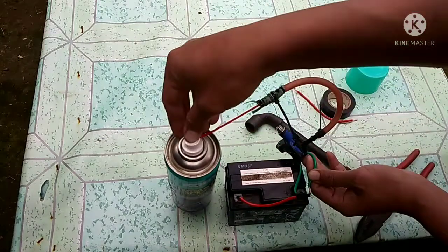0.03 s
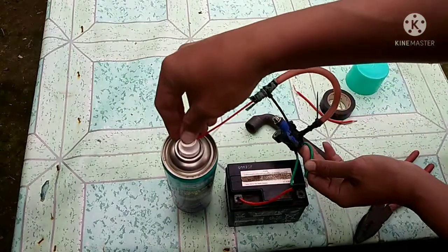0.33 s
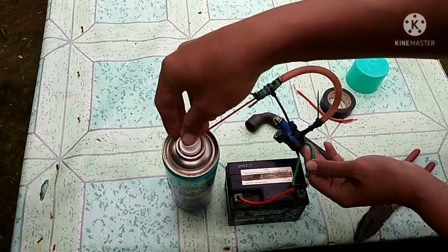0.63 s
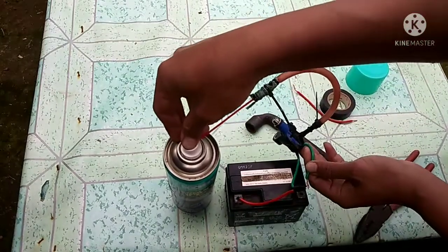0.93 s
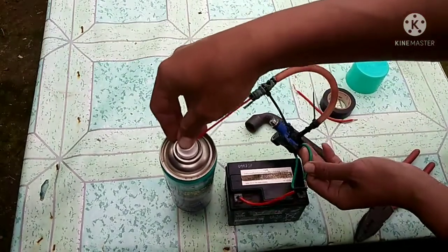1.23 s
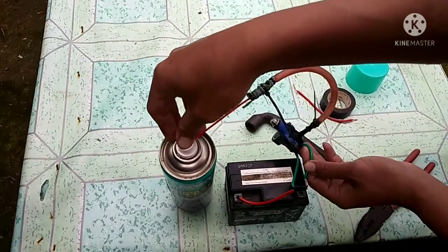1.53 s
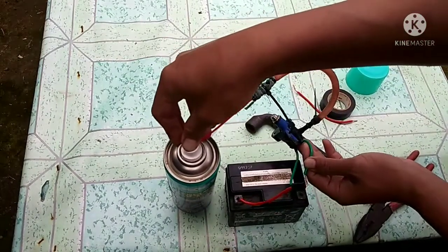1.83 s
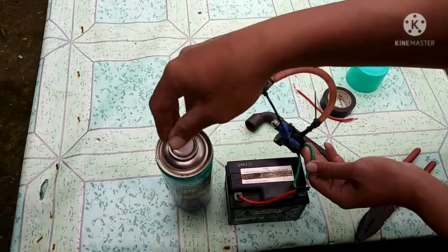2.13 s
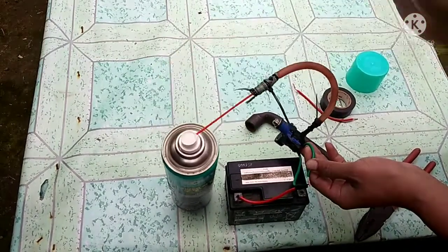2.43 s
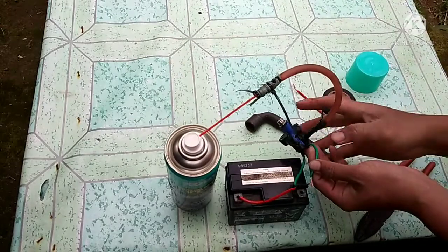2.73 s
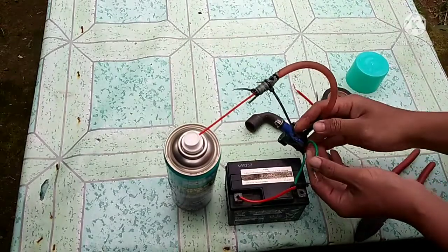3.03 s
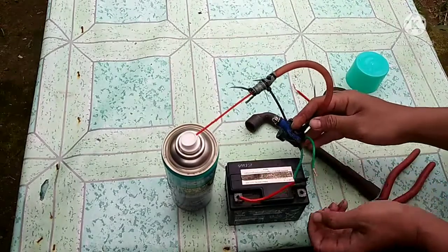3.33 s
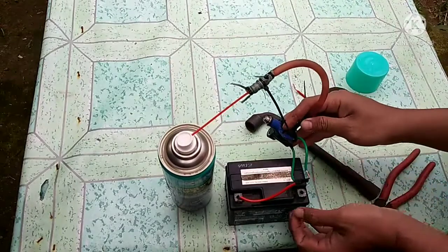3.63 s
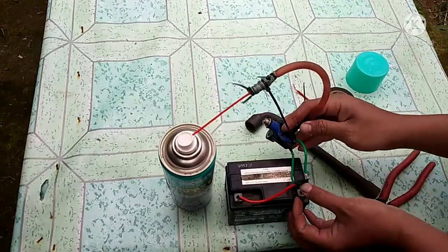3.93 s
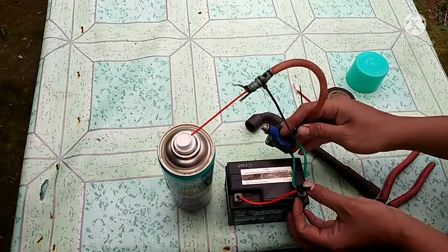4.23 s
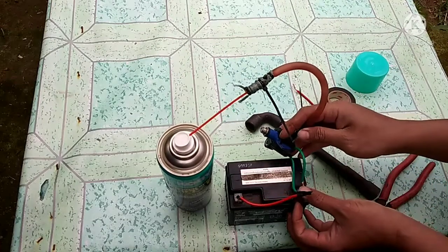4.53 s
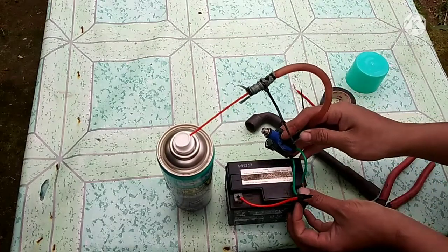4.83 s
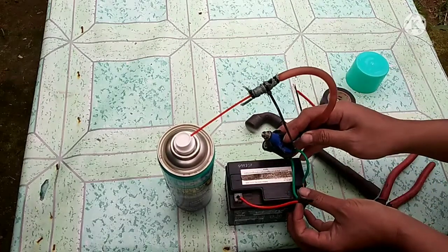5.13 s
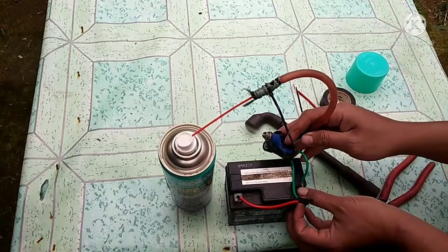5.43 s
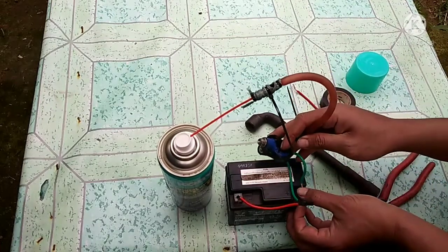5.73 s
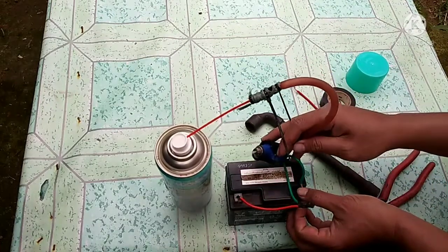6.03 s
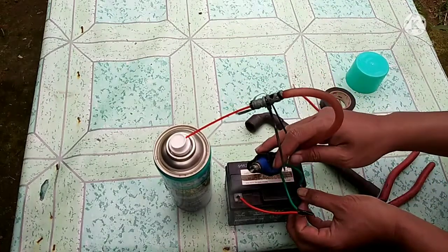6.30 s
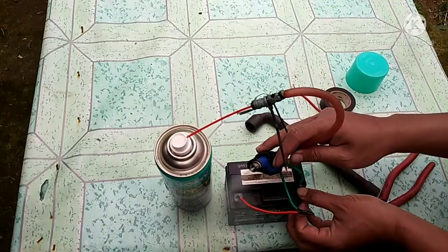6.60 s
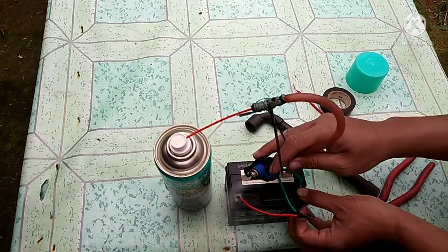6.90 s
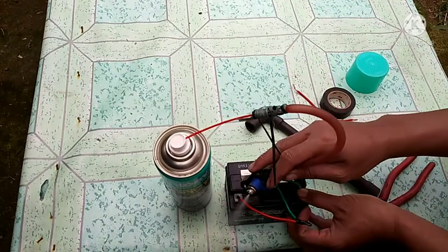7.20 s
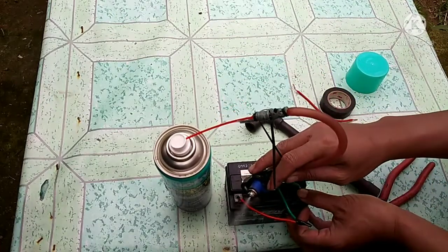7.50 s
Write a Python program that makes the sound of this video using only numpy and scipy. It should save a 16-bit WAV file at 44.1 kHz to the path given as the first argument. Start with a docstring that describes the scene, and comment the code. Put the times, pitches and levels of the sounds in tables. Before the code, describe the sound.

Outdoors, a gusty breeze buffets the microphone throughout with low rumble and uneven thumps, mostly on the left, strongest from 2.2 to 2.8 seconds and again around 5 seconds. A far bird gives three faint falling chirps in the first second. Close by at a table, small parts and a hose are handled: light scuffs and clinks at the start, a soft hollow rub near 1.5 seconds, a dry click at 2 and a weaker one at 3.7. Faint, very high puffs of gas slip from the hose joint at about 0.2, 1.5 and 3.6 seconds. After a scrape at 4.8, a small fuel injector opens at 5 seconds with a light clink, and aerosol cleaner sprays out in a fine, high hiss, slightly left. The hiss sags around 5.5 seconds, recovers near 6 and stutters on until the end at about 7.5 seconds.

```python
"""Outdoors at a table, an aerosol can feeds cleaner through a hose into a small fuel injector.
From the start a gusty breeze buffets the two microphone ports; a far bird chirps in the first second.
Scuffs, clinks, clicks and rubs come and go, and gas slips out at the hose joint three times.
At 5 s a wire touches the battery, the injector opens and a fine jet hisses out just above the table top.
The jet sags, recovers near 6 s and stutters on to the end."""
import sys
import numpy as np
from scipy import signal
from scipy.fft import rfft, irfft, next_fast_len
from scipy.io import wavfile
from scipy.ndimage import uniform_filter1d, map_coordinates

SR = 44100
rng = np.random.default_rng(int(sys.argv[2]) if len(sys.argv) > 2 else 0)


def file_out(sig):
    """Save sig as 16-bit WAV at sys.argv[1]."""
    # one column per channel
    cols = np.atleast_2d(sig).T
    # limit, then scale
    lim = np.clip(cols, -1, 1)
    pcm = np.round(lim * 32767).astype(np.int16)
    wavfile.write(sys.argv[1], SR, pcm)


N = 333396
TIME = np.arange(N) / SR


def amp(db):
    """Decibels to gain."""
    return 10 ** (np.asarray(db) / 20)


def unit(x):
    """x scaled to rms 1."""
    return x / np.sqrt(np.mean(x ** 2) + 1e-20)


def even(x, samples):
    """x with its slow swells levelled out, rms 1."""
    return x / np.sqrt(np.abs(uniform_filter1d(x ** 2, size=samples)) + 1e-6)


def along(points, hz):
    """(Hz, value) points read on a log axis."""
    knots_hz, values = np.transpose(points)
    return np.interp(np.log(hz + 1), np.log(knots_hz + 1), values)


def curves(rows):
    """One value per sample for each column after the time."""
    times, *columns = np.transpose(rows)
    return [np.interp(TIME, times, column) for column in columns]


def wobble(rate_hz):
    """Smooth random curve, rate_hz knots a second."""
    return map_coordinates(rng.standard_normal(int(N * rate_hz / SR) + 4), [TIME * rate_hz])


def arch(start_s, length_s):
    """Half-sine swell."""
    return np.sin(np.pi * np.clip((TIME - start_s) / length_s, 0, 1))


def dips(rows, half_width_s):
    """Depth in dB of bell-shaped dips, from (s, dB) rows."""
    return sum(db * np.exp(-((TIME - s) / half_width_s) ** 2) for s, db in rows)


def add(track, start_s, sound):
    """Mix a sound into a track."""
    part = track[..., max(round(start_s * SR), 0):][..., :sound.shape[-1]]
    part += sound[..., :part.shape[-1]]


def ports(balance_db):
    """Left and right gains giving unrelated signals a mid level of 1; positive balance is left."""
    pair = amp(np.array([balance_db, -balance_db]) / 2)
    return 2 * pair / np.linalg.norm(pair, axis=0)


def filtered(x, response):
    """x times a response of frequency."""
    n = x.shape[-1]
    padded = next_fast_len(n + 8192)
    return irfft(rfft(x, padded) * response(np.fft.rfftfreq(padded, 1 / SR)), padded)[..., :n]


def coloured(x, spectrum):
    """x shaped by (Hz, dB) points."""
    return filtered(x, lambda hz: amp(along(spectrum, hz)))


def painted(x, gain):
    """x times a gain of frequency and time."""
    hz, t, bins = signal.stft(x, SR, nperseg=1024)
    return signal.istft(bins * gain(hz[:, None], t), SR, nperseg=1024)[1][..., :N]


def noise(spectrum, shared=0):
    """Coloured noise of rms 1 at two ports, with a share of the power in common."""
    white = np.sqrt(1 - shared) * rng.standard_normal((2, N)) + np.sqrt(shared) * rng.standard_normal(N)
    return unit(coloured(white, spectrum))


def patches(hz, t, bins, frames):
    """Smooth random field over frequency and time, rms 1."""
    cells = rng.standard_normal((len(hz), len(t)))
    return unit(signal.fftconvolve(cells, np.outer(np.hanning(bins), np.hanning(frames)), "same"))


def resonance(hz, ring_hz, width_hz):
    """Response of one steep-sided resonance."""
    return (hz * width_hz / (ring_hz ** 2 - hz ** 2 + 1j * hz * width_hz)) ** 2


# Each row: frequency in Hz, relative density in dB. Likewise every SPECTRUM below.
AIR_SPECTRUM = [(530, -14), (900, -10), (1040, 8.5), (1170, -25), (1960, -30), (2510, -4), (3000, -14.5),
                (4300, -10), (5720, -7.5), (8190, -18), (14700, -9), (15600, -8)]
# Each row: time in seconds, wash level in dB.
WASH_LEVELS = [(0, -54.5), (1.2, -56.5), (2, -54.5), (4.2, -57.5)]

def background(air_db=-62.5, drift_db=1.77, patch_db=4.6):
    """Steady outdoor air and a dull far wash whose narrow bands swell and fade."""
    far = noise([(100, -17), (300, -2.5), (650, 0), (1100, -6), (2000, -8.5), (3000, -10.5),
                 (4500, -15), (8000, -34.5)])
    wash_gain = amp(curves(WASH_LEVELS)[0] + drift_db * wobble(7.9))
    wash = painted(far, lambda hz, t: amp(patch_db * np.minimum(patches(hz, t, bins=7, frames=9), 2)))
    return amp(air_db) * noise(AIR_SPECTRUM, shared=0.011) + wash_gain * unit(wash)


# Each row: frequency in Hz, t60 of the tail in seconds.
WALL_DECAY = [(200, 1), (750, 0.64), (2000, 0.37), (5000, 0.3), (14000, 0.14)]

def walls(x, early_t60_s=0.065, tail_db=-4):
    """The yard's walls return scattered early reflections and a tail whose treble dies first."""
    hz, t, bins = signal.stft(rng.standard_normal((2, SR)), SR, nperseg=256)
    fade = amp(-60 * t / along(WALL_DECAY, hz)[:, None])
    tail = signal.istft(bins * fade, SR, nperseg=256)[1][:, :SR]
    early = rng.standard_normal((2, SR)) * amp(-60 * TIME[:SR] / early_t60_s)
    response = early / np.linalg.norm(early[0]) + amp(tail_db) * tail / np.linalg.norm(tail[0])
    return signal.fftconvolve(x[None], response, axes=1)[:, :N]


# Each row: start in seconds, first and last pitch in Hz, level in dB.
BIRD_CHIRPS = [(0.437, 3350, 3240, -58.5), (0.713, 4510, 3740, -57.5), (0.938, 3100, 2870, -53)]

def chirps(length_s=0.056):
    """A far bird: falling tones, hoarse from a fast pitch waver."""
    out = np.zeros(N)
    waver = 1 + 0.059 * wobble(700)
    for start_s, first_hz, last_hz, db in BIRD_CHIRPS:
        pitch_hz = np.interp(TIME, [start_s, start_s + length_s], [first_hz, last_hz]) * waver
        out += amp(db) * arch(start_s, length_s) * np.sin(2 * np.pi * np.cumsum(pitch_hz) / SR)
    return out


# Each row: start in seconds, level in dB.
HOLLOW_RUBS = [(1.5, -43.5), (3.57, -50.5), (5.35, -46)]

def rubs(length_s=0.24, ring_hz=663, width_hz=163):
    """Soft swells of friction on something hollow."""
    strokes = sum(amp(db) * arch(start_s, length_s) for start_s, db in HOLLOW_RUBS)
    return strokes * unit(filtered(rng.standard_normal(N), lambda hz: resonance(hz, ring_hz, width_hz)))


# Each row: frequency in Hz, width in Hz, gain in dB.
BODY_MODES = [(1800, 70, -3.5), (1946, 64, 2.5), (2194, 88, 2.5), (2320, 86, -9), (2750, 160, -6),
              (3625, 90, -15), (4150, 170, -15.5)]

def scraped_body(hz):
    """Summed resonances of the scraped thing."""
    return sum(amp(db) * resonance(hz, mode_hz, width_hz) for mode_hz, width_hz, db in BODY_MODES)


SCRAPE_SPECTRUM = [(100, -0.5), (400, 13.5), (750, 13.5), (1200, 3.5), (2200, 3.5), (3500, -5),
                   (5500, -5.5), (7500, -24), (9500, -15), (12000, -10), (15500, -8.5)]
# Each row: start and length in seconds, level in dB, ring pitch and width in Hz,
# then ring, treble and body gains in dB.
SCUFF_STROKES = [(0, 0.0045, -43.5, 2460, 930, 0, 0, 1), (0.144, 0.051, -49, 3100, 500, -5, -1, -10),
                 (0.151, 0.025, -45, 950, 300, 5, -10, -8),
                 (0.301, 0.024, -46.5, 3960, 1500, -5.5, -3, -15),
                 (1.456, 0.11, -42.5, 2100, 890, -3, 1.5, -4.5),
                 (1.548, 0.051, -43.5, 4350, 1200, -9.5, 3, -1),
                 (1.72, 0.035, -45, 3400, 600, -10, -2.5, -14),
                 (1.854, 0.021, -52.5, 2500, 700, -6, -6, -3),
                 (2.029, 0.032, -45, 3600, 2000, -19, -3.5, -16),
                 (2.136, 0.038, -52, 1640, 600, -5, 1, -12), (2.538, 0.048, -47.5, 4230, 1800, -6, 0, -14),
                 (2.563, 0.056, -42, 3130, 1680, -9, -10, -15),
                 (2.932, 0.01, -49.5, 4000, 1510, -22, -2, -12),
                 (3.073, 0.0072, -51.5, 3540, 500, -5, -5, -16),
                 (3.684, 0.01, -43, 1660, 700, -7, 0.5, -14), (3.69, 0.0069, -58, 5870, 300, 14, 2, -16),
                 (4.204, 0.011, -50.5, 1810, 400, -8, 4, -16),
                 (4.831, 0.06, -35.5, 2210, 1380, -7.5, -8, -11),
                 (5.113, 0.014, -37.5, 3200, 1500, -10, -8, -13),
                 (5.418, 0.021, -53, 2100, 400, 10, -5.5, -2)]

def scuffs(rise_share=0.17, release_s=0.015, grain_db=3.5, catch_db=1):
    """Gritty friction strokes: each has its own broad resonance and sets the scraped body ringing."""
    out = np.zeros(N)
    t = TIME[:SR // 4]
    grit = unit(amp(grain_db * wobble(350) + catch_db * wobble(80)))
    for start_s, length_s, db, ring_hz, width_hz, ring_db, treble_db, body_db in SCUFF_STROKES:
        friction, drive = rng.standard_normal((2, len(t))) * grit[round(start_s * SR):][:len(t)]
        shelf = [(5000, 0.022), (11000, treble_db)]
        scrape = unit(filtered(friction, lambda hz: amp(along(SCRAPE_SPECTRUM, hz) + along(shelf, hz))))
        ring = unit(filtered(drive, lambda hz: resonance(hz, ring_hz, width_hz)))
        body = unit(filtered(drive, scraped_body))
        rise = np.minimum(t / (rise_share * length_s), 1)
        fall = np.exp(-np.maximum(t - length_s, 0) / release_s)
        stroke = unit(scrape + amp(ring_db) * ring + amp(body_db) * body)
        add(out, start_s, amp(db) * rise * fall * stroke)
    return out


# Each row: multiple of the pitch, relative gain in dB.
UPPER_MODES = [(1.11, 2.5), (1.55, -19), (1.9, -12)]
# Each row: start in seconds, level in dB, pitch in Hz, t60 in seconds, upper-mode gain in dB.
CLINK_HITS = [(.153, -40.5, 815, 0.14, -12), (.152, -43, 2960, .1, -20), (.197, -49, 3190, 0.087, -22),
              (.308, -40.5, 1465, 0.12, -24), (1.735, -53.5, 3560, 0.14, -22),
              (1.857, -42, 2000, 0.091, -15), (5.109, -30, 1956, 0.067, -2.5)]

def clinks(attack_s=0.00087):
    """Light contacts between small hard things ring a few modes."""
    out = np.zeros(N)
    t = TIME[:SR // 4]
    for start_s, db, pitch_hz, t60_s, upper_db in CLINK_HITS:
        mode = lambda ratio: np.sin(2 * np.pi * (ratio * pitch_hz * t + rng.random()))
        ring = mode(1) + sum(amp(upper_db + mode_db) * mode(ratio) for ratio, mode_db in UPPER_MODES)
        envelope = (1 - np.exp(-t / attack_s)) * amp(-60 * t / t60_s)
        add(out, start_s, amp(db) * envelope * ring)
    return out


CLICK_SPECTRUM = [(300, -7), (700, 13), (1300, 9), (2000, -3), (2800, -3.5), (3600, 3), (4400, -7),
                  (6000, -15), (8000, -19.5), (15000, -21)]
# Each row: start in seconds, relative level in dB.
PART_CLICKS = [(2.059, -29), (3.694, -36.5), (4.209, -49)]

def clicks(decay_s=0.0063, gain_db=-8):
    """Dry cracks of the parts in hand, too close for the walls to matter."""
    out = np.zeros(N)
    t = TIME[:SR // 10]
    for start_s, db in PART_CLICKS:
        crack = unit(coloured(rng.standard_normal(len(t)), CLICK_SPECTRUM))
        add(out, start_s, amp(db + gain_db) * crack * np.exp(-t / decay_s))
    return out


# Each row: time in seconds, strength in dB, balance in dB.
BREEZE_LEVELS = [(0, -36.5, -10), (.2, -50, -6), (.58, -39, -7.5), (1.2, -37, -2), (1.5, -33.5, 5),
                 (2.2, -38, -16), (2.35, -33, -7), (2.7, -24.5, -9), (2.85, -33, 1), (3.4, -30.5, -4.5),
                 (3.9, -32, -2), (4.25, -30.5, -8), (4.4, -24, -4), (5.05, -26.5, -9.5), (5.2, -31.5, -1),
                 (6.85, -36, 0), (7.05, -36.5, -14.5), (7.45, -40, -14), (7.56, -59.5, -10)]
# Each row: centre in seconds, rumble dip in dB (negative lifts).
BREEZE_LULLS = [(.12, -2), (.385, 14), (.57, 7), (.83, 3), (.99, 6), (1.16, 7), (1.23, 6), (1.53, 4),
                (1.89, -8), (2.21, -5), (3.17, 7), (3.61, 1), (3.87, 13), (5.2, 0), (5.56, -1), (5.79, 5),
                (6.44, 5), (7.045, 10.5), (7.125, 7), (7.295, 7)]
# Each row: centre and length in seconds, then rumble, flutter and balance in dB.
WIND_GUSTS = [(0.051, 0.025, -36, -32.5, -6), (0.325, 0.16, -35.5, -50, -15),
              (0.468, 0.16, -31.5, -46.5, -11), (0.712, 0.19, -27, -36, -39), (0.883, 0.12, -35, -41, -31),
              (1.071, 0.033, -30, -33.5, 22), (1.314, 0.055, -36.5, -37, 25),
              (1.827, 0.077, -28, -36.5, -25), (1.966, 0.061, -38, -37.5, -36),
              (2.102, 0.2, -27.5, -31.5, -12), (2.334, 0.24, -23.5, -28.5, -15),
              (2.55, 0.039, -19.5, -24.5, -11), (2.64, 0.036, -25, -24, 5), (2.723, 0.019, -19, -26, -22),
              (2.914, 0.08, -36, -34, -1), (3.087, 0.028, -27, -50, 20), (3.248, 0.064, -29.5, -40, 17),
              (3.362, 0.027, -27.5, -34, -26), (3.976, 0.063, -33, -51, 19), (4.25, 0.054, -37, -36, -25),
              (4.41, 0.092, -32, -29.5, -21), (4.71, 0.073, -24.5, -31.5, 3),
              (4.773, 0.035, -38, -21.5, 15), (4.954, 0.093, -22, -22.5, 10),
              (5.068, 0.11, -22.5, -28, -3.5), (5.304, 0.17, -27.5, -45, 22),
              (5.528, 0.071, -26.5, -43, 21), (5.904, 0.071, -24.5, -37, -25), (5.959, 0.074, -26, -36, 6),
              (6.05, 0.15, -30, -37.5, -2), (6.269, 0.14, -31, -43, -2), (6.373, 0.096, -28, -35.5, -6),
              (6.548, 0.11, -29, -40, 5), (6.646, 0.093, -35, -46.5, 4.5), (6.788, 0.071, -27, -30.5, -26),
              (7.235, 0.12, -34.5, -43.5, -21), (7.369, 0.07, -42.5, -39.5, -28)]

def wind_force(waver_db=3, mean_db=-31, flutter_offset_db=-10.5, flutter_slope=1.53, lull_slope=1.62):
    """Rumble and flutter gains per port: breeze, lulls and gusts. Flutter grows faster than rumble."""
    strength_db, balance_db = curves(BREEZE_LEVELS)
    swing_db = waver_db * np.array([wobble(14), wobble(14)]) - dips(BREEZE_LULLS, half_width_s=0.028)
    rumble = ports(balance_db) * amp(strength_db + swing_db)
    flutter_db = mean_db + flutter_offset_db + flutter_slope * (strength_db - mean_db)
    flutter = ports(balance_db) * amp(flutter_db + lull_slope * swing_db)
    gusts = np.zeros((2, 2, N))
    for centre_s, length_s, gust_rumble_db, gust_flutter_db, side_db in WIND_GUSTS:
        swell = ports(side_db)[:, None] * np.sin(np.linspace(0, np.pi, round(length_s * SR)))
        gust = np.array([amp(gust_rumble_db) * swell, amp(gust_flutter_db) * swell])
        add(gusts, centre_s - length_s / 2, gust)
    return np.hypot([rumble, flutter], gusts)


RUMBLE_SPECTRUM = [(15, -47.5), (30, -24), (50, -10), (75, 0.5), (110, 3), (160, -1.5), (220, -7),
                   (300, -21), (450, -56.5), (800, -92)]
FLUTTER_SPECTRUM = [(90, -34), (170, 4), (250, 5.5), (350, 1), (500, -8), (700, -18.5), (1000, -28),
                    (1500, -48), (3000, -95)]

def buffeting(puffs_per_s=130, spread_db=6, smooth_db=-9):
    """Each port has its own turbulence: a rolling rumble and small puffs of very unequal size."""
    rumble = even(noise(RUMBLE_SPECTRUM), samples=2600)
    arrivals = rng.random((2, N)) < puffs_per_s / SR
    sizes = amp(spread_db * rng.standard_normal((2, N))) * rng.choice([-1, 1], (2, N))
    puffs = even(coloured(arrivals * sizes, FLUTTER_SPECTRUM), samples=3500)
    flutter = unit(puffs + amp(smooth_db) * noise(FLUTTER_SPECTRUM))
    rumble_gain, flutter_gain = wind_force()
    return rumble_gain * rumble + flutter_gain * flutter


# Each row: multiple of the eddy's pitch, gain in dB.
PUSH_SHAPE = [(.13, -23), (.4, 5.5), (1, 6.5), (2.15, -1), (3, -12.5), (4, -19.5), (5.3, -33.5), (7.7, -47),
              (13, -73)]
# Each row: time in seconds, level in dB, balance in dB, pitch in Hz (low for a large eddy).
EDDY_THUMPS = [(0.048, -44, -20, 190), (0.087, -32, -21, 233), (0.462, -26.5, -20, 254),
               (.626, -25, -26, 296), (.671, -22.5, -28, 225), (0.681, -30, -22, 290),
               (0.718, -14, -32, 185), (0.746, -35, -18, 187), (.758, -35, -20, 300), (1.067, -27, 21, 177),
               (1.951, -15, -34, 152), (2.08, -14, -28, 182), (2.13, -22, -13, 200),
               (2.236, -17.5, -20, 320), (2.258, -12, -29, 290), (2.295, -13, -24, 325),
               (2.313, -11, -12, 200), (2.327, -8, -22, 352), (2.35, -7.5, -28, 370),
               (2.355, -10, -27, 310), (2.373, -6.5, -29, 320), (2.385, -11, -27, 280),
               (2.399, -14, -18, 270), (2.425, -18, -18, 262), (2.454, -24.5, -3, 380),
               (2.471, -15, -23, 295), (2.54, -5.5, -35, 214), (2.591, -16, -17, 270),
               (2.627, -17.5, -10, 252), (2.647, -12.5, -15, 320), (2.672, -15, -26, 300),
               (2.693, -12, -22, 314), (2.722, -12, -34, 274), (2.781, -23, -20, 273),
               (3.001, -24, 25, 282), (3.085, -26, 11, 157), (3.3, -23, 3, 237), (4.157, -23, -16, 170),
               (4.229, -22, -22, 170), (4.333, -28, -21, 410), (4.378, -33, -3.5, 380),
               (4.405, -17, -13, 160), (4.441, -23.5, -19, 280), (4.509, -26, -5, 280),
               (4.557, -24, -20, 390), (4.597, -35, -17, 650), (4.685, -12.5, 4, 120),
               (4.707, -24, -13, 290), (4.744, -30.5, -13, 450), (4.773, -22, 7, 258), (4.945, -6, 35, 310),
               (5.051, -10.5, -25, 330), (5.074, -22, -5, 210), (5.092, -11, -24, 247),
               (5.42, -18, -4, 129), (5.885, -18.5, -24, 243), (6.2, -26, -10, 260),
               (6.305, -27.5, -6, 185), (6.371, -23.5, -16, 240), (6.78, -25, -21, 265),
               (6.798, -14, -22, 150), (6.853, -18, -26, 113), (6.886, -21, -22, 192),
               (6.965, -32.5, -7, 214), (7.199, -31.5, -20, 330), (7.255, -30, -27, 270),
               (7.36, -31, -29, 278), (7.377, -33, -25, 380), (7.464, -37.5, -16, 170)]

def eddies(low_cut_hz=90, wake_db=-26, wake_s=0.007):
    """An eddy is one pressure push with a ragged wake; the microphone's low cut makes it swing back."""
    out = np.zeros((2, N))
    t = TIME[:SR // 20] - 0.02
    impulse = signal.unit_impulse(len(t), np.argmin(np.abs(t)))
    wake = amp(wake_db) * (t > 0) * np.exp(-np.abs(t) / wake_s)
    for time_s, db, balance_db, pitch_hz in EDDY_THUMPS:
        spectrum = np.array(PUSH_SHAPE) * [pitch_hz, 1]
        push = coloured(impulse + wake * rng.standard_normal(len(t)), spectrum)
        push /= coloured(impulse, spectrum).max()
        add(out, time_s + t[0] + 0.001, -amp(db) * ports(balance_db)[:, None] * push)
    return signal.sosfilt(signal.butter(1, low_cut_hz, "highpass", fs=SR, output="sos"), out)


MIST_SPECTRUM = [(4000, -15), (7000, -10), (9200, -9.5), (10500, -4), (12000, 1), (13000, 0.5),
                 (14500, 5.5), (15300, 11.5), (16000, -4)]
# Each row: start and length in seconds, relative level in dB.
JOINT_LEAKS = [(0.15, 0.29, -57.5), (1.547, 0.031, -44), (3.602, 0.029, -49.5)]

def leaks(crackle_db=2):
    """Gas spits from the hose joint in short, very high puffs, left of centre."""
    puffs = sum(amp(db) * arch(start_s, length_s) for start_s, length_s, db in JOINT_LEAKS)
    crackle = unit(amp(crackle_db * wobble(155)))
    return puffs * crackle * noise(MIST_SPECTRUM) * amp([[2], [-4]])


OPEN_S = 5.022  # the injector opens
# Each row: start and end in seconds, first and last centre in Hz, width in Hz, gain in dB.
HISS_BANDS = [(5.3, 5.95, 2450, 2150, 120, -7), (5.85, 7.6, 2060, 2080, 120, -9),
              (6.0, 7.1, 1680, 1600, 120, -8), (5.45, 6.15, 3300, 3050, 140, -12),
              (6.15, 7.6, 3050, 3220, 130, -10), (6.05, 6.32, 5040, 4960, 170, -24),
              (6.28, 7.05, 4760, 4720, 110, -17), (5.08, 5.85, 6660, 6560, 140, -17),
              (5.57, 5.86, 6100, 6150, 190, -15), (6.6, 7.6, 6150, 6300, 150, -16),
              (6.9, 7.6, 7150, 7320, 170, -15), (6.7, 7.6, 8150, 8280, 160, -13),
              (5.1, 5.42, 9050, 9000, 230, -20), (5.78, 6.05, 9080, 9000, 290, -22),
              (6.05, 6.45, 9150, 9350, 170, -11), (5.05, 5.75, 4000, 3880, 240, 4),
              (5.6, 6.3, 4600, 4400, 230, 4.5), (6.05, 7.1, 5880, 5800, 170, 5),
              (6.4, 7.6, 6600, 6750, 170, 4)]

def hiss_colour(hz, t, fade_s=0.09, tap_db=-19, taps=8, stretch_per_s=0.045):
    """Narrow notches and ridges drift through the hiss, over a faint gliding comb."""
    colour_db = 0
    for start_s, end_s, first_hz, last_hz, width_hz, db in HISS_BANDS:
        presence = np.clip(np.minimum(t - start_s, end_s - t) / fade_s + 0.5, 0, 1)
        centre_hz = np.interp(t, [start_s, end_s], [first_hz, last_hz])
        colour_db += db * presence * np.exp(-((hz - centre_hz) / width_hz) ** 2)
    # The delays lengthen, so the comb glides down.
    delays_s = rng.uniform(0.002, 0.008, (taps, 1, 1)) * (1 + stretch_per_s * (t - OPEN_S))
    comb = 1 + sum(amp(tap_db) * np.exp(-2j * np.pi * hz * delay_s) for delay_s in delays_s)
    return np.abs(comb) * amp(colour_db)


def hollows(hz, t, swell_db=2.2, hollow_db=12, threshold=0.58):
    """Narrow hollows drift through the hiss; thin bands swell and fade."""
    slow = patches(hz, t, bins=8, frames=21)
    quick = patches(hz, t, bins=8, frames=11)
    reach = along([(9000, 1), (13000, 0.25)], hz)
    return amp(swell_db * quick - hollow_db * reach * np.maximum(slow - threshold, 0))


HISS_SPECTRUM = [(400, -34), (900, -22), (1150, -2), (1600, -2.5), (2200, 1.5), (2700, 6.5), (3300, 1),
                 (3800, 4.5), (4300, 3.5), (5200, 3), (5850, 1), (7500, -2), (10000, -6.5), (16000, -8)]
# Each row: time in seconds, relative hiss and mist levels in dB.
JET_LEVELS = [(5.05, -45, -39.5), (5.25, -49, -44.5), (5.65, -50, -47), (6.0, -48, -41), (6.17, -45, -37.5),
              (6.65, -46.5, -40), (7.0, -45.5, -38), (7.25, -47, -39.5), (7.56, -47, -40)]
# The nozzle turns left. Each row: time in seconds, balance in dB.
MIST_BALANCE = [(5.5, 6), (6.0, 8)]
# Each row: centre in seconds, mist dip in dB.
FLOW_STUTTERS = [(6.06, 5.5), (6.735, 3), (6.9, 7.5), (7.09, 8.5), (7.285, 6.5), (7.475, 4.5)]
# Each row: frequency in Hz, gain in dB.
RIGHT_PORT_RESPONSE = [(6850, 0), (7100, -16), (7500, -16), (7850, 0), (11000, 1.5), (11650, -3),
                       (12400, 2), (15500, 0)]

def spray(valve_rise_s=0.014, sputter_db=0.45, flicker_db=1, mist_trim_db=-1.5, hiss_falter_share=0.81):
    """The injector's jet hisses and tears into mist in tiny spurts; notches drift through the sound."""
    hiss_db, mist_db = curves(JET_LEVELS)
    balance_db, = curves(MIST_BALANCE)
    falter_db = dips(FLOW_STUTTERS, half_width_s=0.025)
    valve = np.clip((TIME - OPEN_S) / valve_rise_s, 0, 1)
    hiss = amp(hiss_db - hiss_falter_share * falter_db) * noise(HISS_SPECTRUM, shared=0.42)
    mist_gain = amp(mist_db + mist_trim_db - falter_db + flicker_db * wobble(55))
    mist = mist_gain * ports(balance_db) * noise(MIST_SPECTRUM)
    spurts = unit(amp(sputter_db * wobble(900) + flicker_db / 2 * wobble(50)))
    jet = spurts * (hiss + mist)
    left, right = valve * painted(jet, lambda hz, t: hiss_colour(hz, t) * hollows(hz, t))
    return np.array([left, coloured(right, RIGHT_PORT_RESPONSE)])


def scene(direct_db=-6):
    """The spray at the table, the yard around it and the wind on the microphone."""
    contacts = scuffs() + clinks()
    table = spray() + leaks() + clicks()
    yard = amp(direct_db) * contacts + walls(contacts + rubs() + chirps()) + background()
    wind = buffeting() + eddies()
    return table + yard + wind


def record(dry, ceiling=0.9, top_hz=15560):
    """Soft clip on the strongest thumps, then a steep band limit."""
    rounded = dry / (1 + np.abs(dry / ceiling) ** 4) ** (1 / 4)
    return filtered(rounded, lambda hz: 1 / np.sqrt(1 + (hz / top_hz) ** 300))


dry = scene()
out = record(dry)
file_out(out)
```